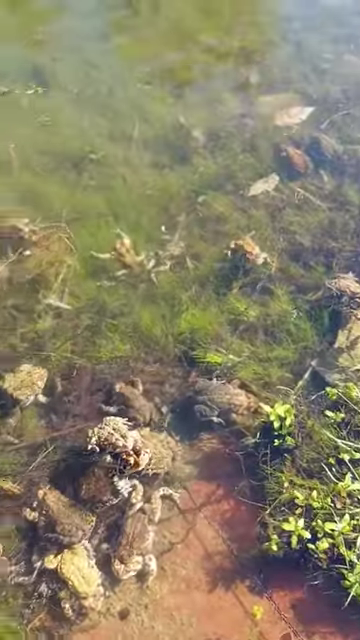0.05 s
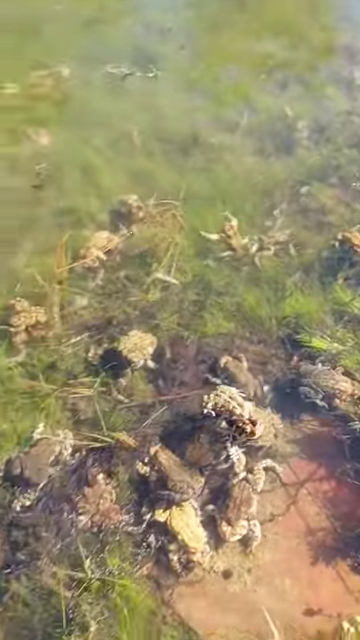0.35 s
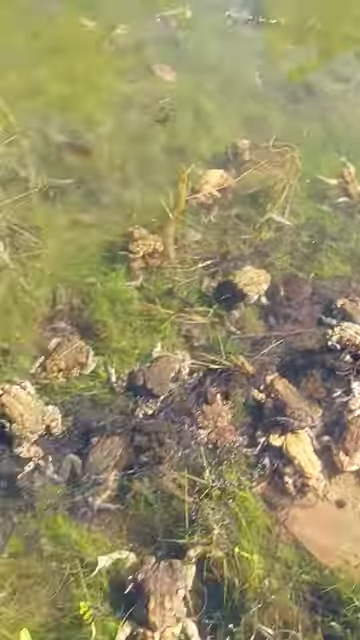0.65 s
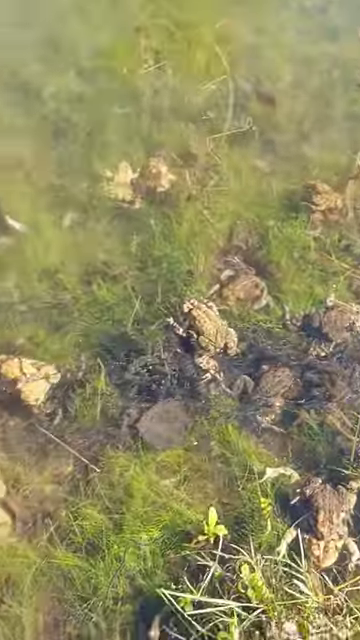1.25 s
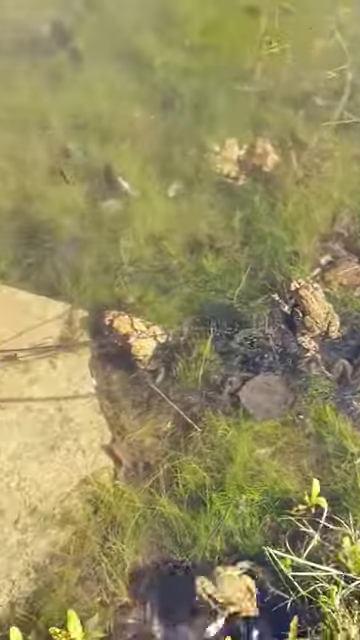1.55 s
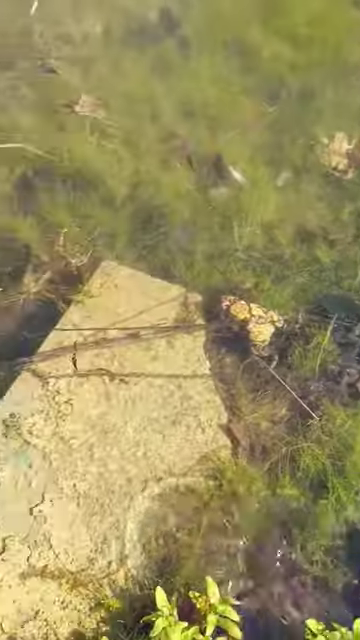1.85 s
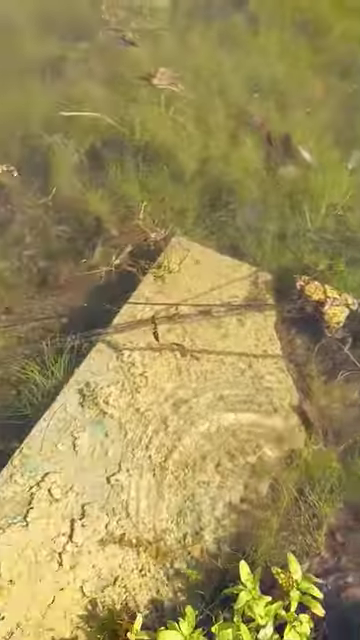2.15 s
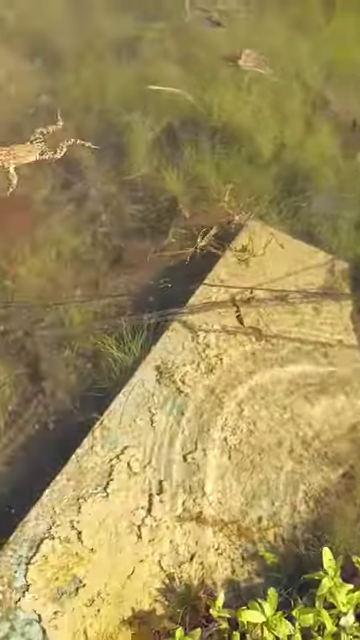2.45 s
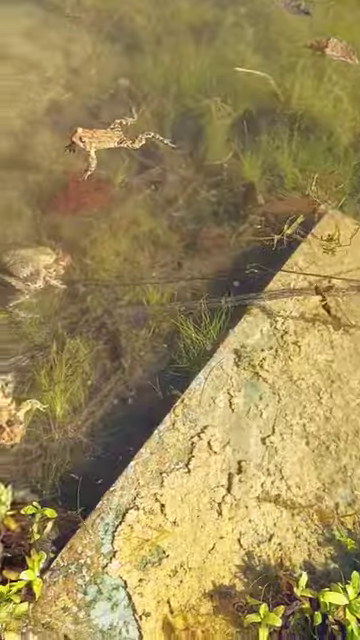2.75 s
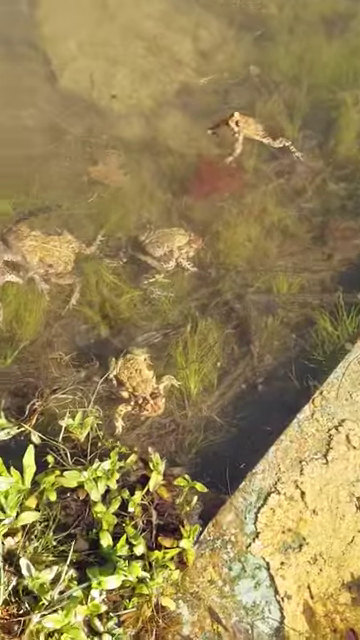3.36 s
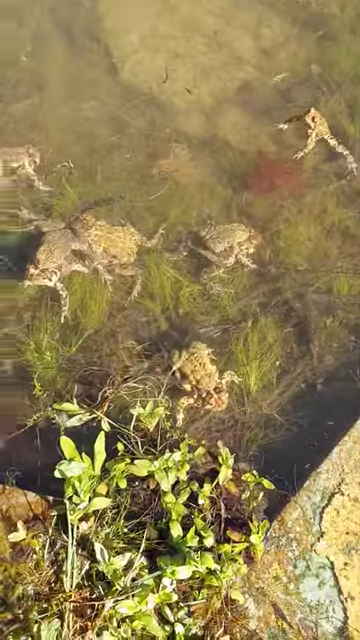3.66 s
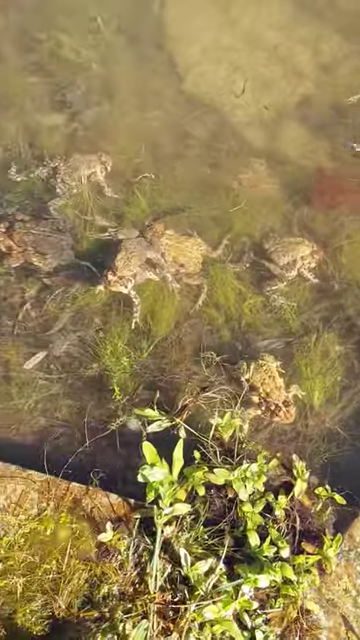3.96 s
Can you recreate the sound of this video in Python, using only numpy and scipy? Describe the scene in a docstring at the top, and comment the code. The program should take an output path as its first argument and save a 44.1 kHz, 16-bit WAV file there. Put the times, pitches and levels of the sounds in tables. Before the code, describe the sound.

Toads trill throughout in a high, pulsing chorus at a pond edge, with two near ones swelling in at 0.6 and 1.4 seconds. Close plants rustle at the start, with one soft plop at 0.2 seconds, then rustle and snap loudest around 1.4 seconds. A few short croaky chirps dot the first 2.5 seconds. Air softly bumps the microphone from 0.8 seconds, and a bird whistles very faintly from 1.6.

```python
"""Toads trill at a pond edge over light air: each trill is a train of tone pulses that swells, rises in
pitch and slowly loses pace. A farther chorus sounds from the start; plants rustle and snap close by, the
water plops once, and the first of a few croaky chirps follows. Two near toads join at 0.6 and 1.4 s,
and from 0.8 s air bumps the turning microphone. The plants are loudest near 1.4 s, where grass scrapes.
From 1.6 s a small bird whistles thinly, and the trills run on, echoing from the banks."""
import sys
import numpy as np
from scipy import signal
from scipy.fft import rfft, irfft, next_fast_len
from scipy.io import wavfile
from scipy.ndimage import map_coordinates

SR = 44100
rng = np.random.default_rng(int(sys.argv[2]) if len(sys.argv) > 2 else 0)


def generate_wav(sig):
    """Save sig (samples, or channels by samples) to the path in sys.argv[1] as 16-bit PCM at SR."""
    pcm = np.round(np.clip(np.atleast_2d(sig).T, -1, 1) * 32767).astype(np.int16)
    wavfile.write(sys.argv[1], SR, pcm)


N = 176400
T = np.arange(N) / SR
SIDES = np.array([[1], [-1]])  # left, right


def amp(db):
    """Decibels to amplitude ratio."""
    return 10 ** (np.asarray(db) / 20)


def unit(x):
    """Normalisation to rms 1."""
    return x / np.sqrt(np.mean(x ** 2) + 1e-20)


def curve(rows):
    """Linear interpolation over time."""
    return np.interp(T, *np.transpose(rows))


def along(points, hz):
    """Interpolation over log frequency."""
    knots_hz, values = np.transpose(points)
    return np.interp(np.log(hz + 1), np.log(knots_hz + 1), values)


def pan(db):
    """Amplitude panning by a left-minus-right level difference."""
    gains = amp(SIDES * db / 2)
    return gains / gains.mean()


def wobble(knots_per_s):
    """Smooth random modulation."""
    return map_coordinates(rng.standard_normal(1024), [T * knots_per_s], mode="wrap")


def filtered(x, response):
    """Linear filtering: the spectrum times a frequency response."""
    size = next_fast_len(N + SR // 2)
    return irfft(rfft(x, size) * response(np.fft.rfftfreq(size, 1 / SR)), size)[..., :N]


def swells(rows):
    """A sum of Gaussian envelopes."""
    return sum(amp(db) * np.exp(-((T - centre) / half) ** 2) for centre, half, db in rows)


# Likeness of the two channels. Each row: frequency in Hz, left-right correlation.
COHERENCE = [(40, 0), (200, .6), (600, 0.15), (3000, -0.11), (12000, -0.17)]
def rush(spectrum):
    """Partial coherence: independent mid and side noises mix into coloured stereo noise of rms 1."""
    def response(hz):
        angle = np.arccos(np.clip(along(COHERENCE, hz), -1, 1)) / 2
        return amp(along(spectrum, hz)) * [np.cos(angle), np.sin(angle)]
    mid, side = filtered(rng.standard_normal((2, N)), response)
    return unit(np.array([mid + side, mid - side]))


# Colour of the air. Each row: frequency in Hz, relative level in dB.
AIR_SPECTRUM = [(20, -10), (60, 3), (130, -2), (300, -3.5), (600, -7), (1100, -0.5), (2200, -5.5),
                (3000, -11.5), (4000, -10), (5000, -15), (7500, -13), (9500, -25.5), (14000, -16.5),
                (16000, -28)]
# Strength of the air. Each row: time in seconds, level in dB.
AIR_LEVELS = [(0, -64.5), (1, -64.5), (2.2, -61.5), (4, -61)]
def light_air():
    """Broadband noise under a slowly rising envelope."""
    return rush(AIR_SPECTRUM) * amp(curve(AIR_LEVELS))


def trill(start, rate, rate_change, hz, flat_hz, width_ms):
    """Pulse modulation: envelope and carrier phase of a toad's train of Gaussian tone pulses."""
    jitter_ms, scatter_db, scatter_hz = .18, .6, 5.1  # from pulse to pulse
    rise_s, sag_hz_per_ms = .29, 6.7  # pitch rises over the trill and falls within a pulse
    age = T - start
    cycles = rate * age + rate_change * age ** 2 / 2
    pulse = np.clip(np.round(cycles), 0, 511).astype(int)
    late, size, tune = rng.standard_normal((512, 3))[pulse].T
    offset_ms = (cycles - pulse) / (rate + rate_change * age) * 1000 - jitter_ms * late
    droop = (1 + rate_change * age / rate) ** .21  # pitch follows the slowing pace
    pitch = hz * droop - flat_hz * np.exp(-np.maximum(age, 0) / rise_s) + scatter_hz * tune
    closing = np.clip(8 * (.5 - abs(cycles - pulse)), 0, 1)  # silence between pulses
    bell = np.exp(-(offset_ms / width_ms) ** 2 / 2)
    envelope = bell * np.sin(closing * np.pi / 2) ** 2 * amp(scatter_db * size)
    return envelope, 2 * np.pi * (pitch - sag_hz_per_ms * offset_ms / 2) * offset_ms / 1000


# Strength of the far chorus. Each row: time in seconds, level in dB.
CHORUS_LEVELS = [(0, -58), (1, -55.5), (2.2, -54.5), (4, -49.5)]
def far_toads(count=5, centre_hz=1558, spread_hz=42.8):
    """Superposition: trills round the pond, each at its own pace and pitch, merge into a chorus."""
    out = np.zeros((2, N))
    pitches = centre_hz + spread_hz * np.linspace(-1, 1, count)
    for hz, (head_start, pace, side) in zip(pitches, rng.random((count, 3))):
        envelope, phase = trill(-head_start, 42 + 24 * pace, -1, hz, flat_hz=0, width_ms=2.67)
        out += envelope * np.sin(phase - side * SIDES)
    return unit(out) * amp(curve(CHORUS_LEVELS))


# Pace of each trill. Each row: start and end in seconds, pulses per second, change of that rate per second.
TRILL_PACES = [(1.4083, 4.5, 51.9, -1.34), (.6098, 4.5, 62.89, -2.15), (.0077, 1.0, 40.12, -.72),
               (.004, 1.3, 64, -2), (1.958, 4.2, 50.2, -2.7), (1.72, 4.5, 43.5, -1.5)]
# Voices of the same trills. Each row: pitch and starting flatness in Hz, full level in dB, swell time in
# seconds, pulse half-width in ms, 2nd and 3rd harmonics before strain in dB, left minus right in dB.
TRILL_VOICES = [(1696.5, 20, -27.5, 0.23, 2.97, -78.5, -92.5, 3), (1667, 420, -32, 0.3, 1.63, -63, -94, 5),
                (1798, 4.6, -44, 0.0017, 2.7, -86, -89, 8), (1572, 8.7, -47.5, .005, 2.2, -99, -102, -1),
                (1314, 6.5, -44.5, 0.3, 2.8, -88.5, -78, 0), (1624, 180, -42, 0.05, 3.3, -82, -91.5, 4)]
# The left port hears the toads first. Each row: time in seconds, lead in ms.
LEFT_LEADS = [(0, .41), (1.7, .43), (2.5, .49), (3.3, .535), (4, .535)]
def near_toads(swell_db=23.5, release_s=.079, strain_db=19.5, strain_s=.64, onset_s=.31):
    """Harmonic trills swell, hold and fade; a path difference shifts their phase between the ports."""
    out = np.zeros((2, N))
    lead_s = curve(LEFT_LEADS) / 1000
    for (start, end, rate, rate_change), voice in zip(TRILL_PACES, TRILL_VOICES):
        hz, flat_hz, db, swell_s, width_ms, second_db, third_db, pan_db = voice
        envelope, phase = trill(start, rate, rate_change, hz, flat_hz, width_ms)
        age = np.maximum(T - start, 0)
        phase = phase + np.pi * hz * lead_s * SIDES
        tone = amp(db - swell_db * np.exp(-age / swell_s)) * np.sin(phase)
        flutter = .3 * wobble(400)  # radians
        second = amp(second_db) * np.sin(2 * phase + flutter)
        third = amp(third_db) * np.sin(3 * phase + flutter)
        # overtones are strongest while a trill is getting started
        strain = amp(strain_db * np.exp(-age / strain_s)) * np.minimum(age / onset_s, 1)
        release = np.clip((end - T) / release_s, 0, 1)
        out += pan(pan_db) * envelope * (tone + strain * (second + third)) * release
    return out


def bank_echo(calls, positions=9, t60_s=.12, db=-11.5):
    """Scattering from the banks: short decaying echoes crossfade as the microphone moves."""
    delay, out = T[:SR // 3], np.zeros((2, N))
    for k in range(positions):
        tail = rng.standard_normal((2, len(delay))) * amp(-60 * delay / t60_s) * (delay > .003)
        share = np.sqrt(np.clip(1 - abs(T / T[-1] * (positions - 1) - k), 0, 1))
        out += signal.fftconvolve(calls * share, tail / np.linalg.norm(tail[0]), axes=1)[:, :N]
    return amp(db) * out


def plant_noise(unshared_db=-2):
    """Partly correlated white noise: one part common to both ports, one part separate."""
    return unit(rng.standard_normal(N) + amp(unshared_db) * rng.standard_normal((2, N)))


# Strength of the rustle. Each row: time in seconds, level in dB.
RUSTLE_LEVELS = [(0, -72.5), (.04, -62.5), (.08, -48), (.165, -48), (.21, -59.5), (.35, -69.5),
                 (.68, -79.5), (.77, -68), (.87, -74), (1.19, -61.5), (1.245, -48), (1.32, -42),
                 (1.37, -43), (1.475, -42.5), (1.51, -51), (1.62, -63.5), (1.78, -69.5), (1.915, -46),
                 (1.945, -58.5), (2.015, -54.5), (2.07, -61.5), (2.26, -65.5), (2.36, -74), (3.7, -94),
                 (3.95, -61)]
def rustling_leaves(ticks_per_s=1100, spread_db=2.5, hiss_db=1, flutter_db=1.63):
    """Shot noise: tiny random ticks of leaves merge with a hiss, and the level flutters."""
    sizes = amp(spread_db * np.minimum(rng.exponential(size=N), 3))
    ticks = unit((rng.random(N) < ticks_per_s / SR) * sizes * plant_noise())
    envelope = amp(curve(RUSTLE_LEVELS) + flutter_db * wobble(90))
    return unit(ticks + amp(hiss_db) * plant_noise()) * envelope


# Crushes under the rustle. Each row: centre and half-length in seconds, level in dB.
CRUSH_SWELLS = [(.13, 0.093, -58), (1.385, 0.12, -46), (1.93, 0.22, -60)]
# Their colour. Each row: frequency in Hz, relative level in dB.
CRUSH_SPECTRUM = [(60, -5), (250, -17.5), (500, -16), (900, -11.5), (1500, 2), (2300, 2), (3000, -21.5),
                  (6000, -37)]
def crushed_plants():
    """Amplitude-modulated noise: the plants' dull crush swells and dies away."""
    return swells(CRUSH_SWELLS) * rush(CRUSH_SPECTRUM)


# Snapping stems. Each row: start in seconds, relative level in dB.
STEM_SNAPS = [(0.08, -43.5), (.170, -37.5), (.422, -47.5), (0.452, -46.5), (0.729, -49.5), (.758, -44.5),
              (0.796, -47), (1.153, -47), (1.3215, -23.5), (1.398, -26.5), (1.448, -35), (1.466, -33),
              (1.469, -36.5), (1.56, -41), (1.959, -40), (1.991, -38), (2.009, -34.5), (2.018, -43.5),
              (2.043, -36.5), (2.057, -46.5), (2.119, -46), (2.128, -43), (2.189, -48.5), (2.229, -44.5),
              (2.255, -48), (2.284, -35.5), (2.512, -53), (2.609, -53.5), (3.75, -51)]
# Snaps are brighter than the rustle. Each row: frequency in Hz, gain in dB.
SNAP_BRIGHTNESS = [(1500, -7.5), (6000, 2.5), (13000, 1.5)]
def snapping_stems(t60_s=.0078, gain_db=-2):
    """Damped transients: each snap is a sudden burst of noise with exponential decay."""
    envelope = sum(amp(db + gain_db - 60 * np.abs(T - start) / t60_s) * (T >= start)
                   for start, db in STEM_SNAPS)
    return filtered(envelope * plant_noise(), lambda hz: amp(along(SNAP_BRIGHTNESS, hz)))


PLANT_PAN_DB = -5
# Colour of leaves and stems. Each row: frequency in Hz, relative level in dB.
FOLIAGE_SPECTRUM = [(1500, 8), (2300, -27.5), (2900, -6.5), (3600, -4.5), (4300, -6.5), (4900, -6),
                    (5600, -8.5), (6800, -1.5), (8000, -9), (9000, -19), (10200, -8.5), (11700, -2.5),
                    (14000, -2), (15700, -8)]
def foliage(excitation, low_cut_hz=1500, left_lag_s=.0005):
    """Source and filter: rustle and snaps take the plants' colour and reach the left port later."""
    def response(hz):
        colour = unit(amp(along(FOLIAGE_SPECTRUM, hz)) * hz ** 2 / (hz ** 2 + low_cut_hz ** 2))
        return colour * np.exp(-1j * np.pi * hz * left_lag_s * SIDES)
    return pan(PLANT_PAN_DB) * filtered(excitation, response)


def water_plop(start=.178, hz=251, db=-42, t60_s=.07, attack_s=.004):
    """Damped oscillation: one low, soft ring in the water."""
    age = np.maximum(T - start, 0)
    envelope = amp(db - 60 * age / t60_s) * (1 - np.exp(-age / attack_s))
    return envelope * np.sin(2 * np.pi * hz * age)


# Croaky chirps. Each row: start and length in seconds, top pitch in Hz, level in dB,
# left minus right in dB, roughness in radians.
CHIRP_NOTES = [(0.292, 0.025, 1048, -46, 2, 0.37), (0.701, 0.029, 1044, -48, 1, 0.14),
               (1.168, 0.021, 1010, -54, 4, 0.4), (2.363, 0.02, 1005, -51, 2, 0.85)]
def chirps(arch_hz=72.4, octave_db=-6.5):
    """Random phase modulation makes short arched notes and their octaves hoarse."""
    out = np.zeros((2, N))
    for start, length, hz, db, pan_db, roughness in CHIRP_NOTES:
        arch = np.sin(np.pi * np.clip((T - start) / length, 0, 1))
        phase = 2 * np.pi * np.cumsum(hz - arch_hz * (1 - arch)) / SR + roughness * wobble(450)
        out += pan(pan_db) * amp(db) * arch * (np.sin(phase) + amp(octave_db) * np.sin(2 * phase))
    return out


# Puffs of air. Each row: centre and half-length in seconds, level in dB.
BUMP_SWELLS = [(.85, 0.065, -51), (1.16, 0.029, -53), (1.47, 0.032, -54.5), (1.61, 0.054, -55),
               (1.86, 0.059, -49.5), (2.02, 0.093, -58), (2.29, 0.12, -62.5), (2.53, 0.027, -57),
               (2.72, .04, -61), (3.15, 0.13, -59.5), (3.47, 0.053, -55), (3.63, 0.076, -50.5)]
# Their colour. Each row: frequency in Hz, relative level in dB.
BUMP_SPECTRUM = [(15, -36.5), (30, -7.5), (55, 0.5), (120, -10), (170, -26.5), (400, -35.5), (1000, -83.5)]
def air_bumps():
    """Pressure fluctuation: air meeting the microphone makes brief low rumbles."""
    return swells(BUMP_SWELLS) * rush(BUMP_SPECTRUM)


# Grass scrapes. Each row: centre and half-length in seconds, level in dB.
SCRAPE_SWELLS = [(1.466, 0.007, -48.5), (1.455, 0.061, -49.5)]
# Their colour. Each row: frequency in Hz, relative level in dB.
SCRAPE_SPECTRUM = [(2000, -19), (3800, -9.5), (5700, 2), (7000, -0.5), (9000, -26), (15000, -21)]
def scraping_grass():
    """Friction noise: sliding blades of grass hiss briefly in the treble."""
    return pan(PLANT_PAN_DB) * swells(SCRAPE_SWELLS) * rush(SCRAPE_SPECTRUM)


# Thin whistles. Each row: start and length in seconds, first and last pitch in Hz, level in dB.
BIRD_WHISTLES = [(1.614, 0.38, 9050, 7800, -75), (3.4, 0.19, 7720, 7560, -71.5),
                 (3.597, .1, 6810, 6650, -67.5), (3.83, .24, 9450, 9360, -74)]
def bird(waver_hz=88.5):
    """Frequency modulation: each whistle is a pure tone that wavers as it glides down."""
    out = np.zeros(N)
    for start, length, from_hz, to_hz, db in BIRD_WHISTLES:
        progress = np.clip((T - start) / length, 0, 1)
        hz = from_hz + (to_hz - from_hz) * progress + waver_hz * wobble(400)
        out += amp(db) * np.sin(np.pi * progress) * np.sin(2 * np.pi * np.cumsum(hz) / SR)
    return out


# The toads' balance as the microphone turns. Each row: time in seconds, left minus right in dB.
TOAD_BALANCE = [(0, 4.5), (.7, -5), (1.4, 0), (2.2, -5.1), (2.8, -2), (3.3, 0.5), (4, -1.5)]
def scene():
    """Superposition of air, calls and their echo, plants and water."""
    turn = amp(curve(TOAD_BALANCE) / 2 * SIDES)
    calls = turn * (far_toads() + near_toads()) + chirps() + bird()
    plants = foliage(rustling_leaves() + snapping_stems()) + crushed_plants() + scraping_grass()
    return light_air() + calls + bank_echo(calls) + plants + water_plop() + air_bumps()


def record(dry):
    """Band limiting: an ideal low-pass filter."""
    return filtered(dry, lambda hz: hz < 15800)


dry = scene()
out = record(dry)
generate_wav(out)
```